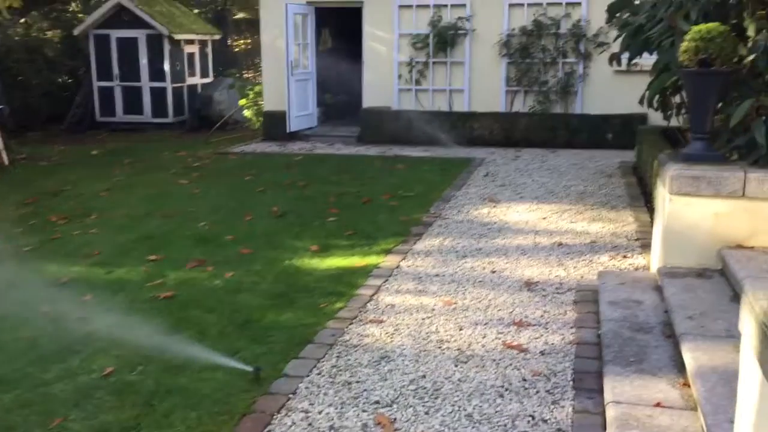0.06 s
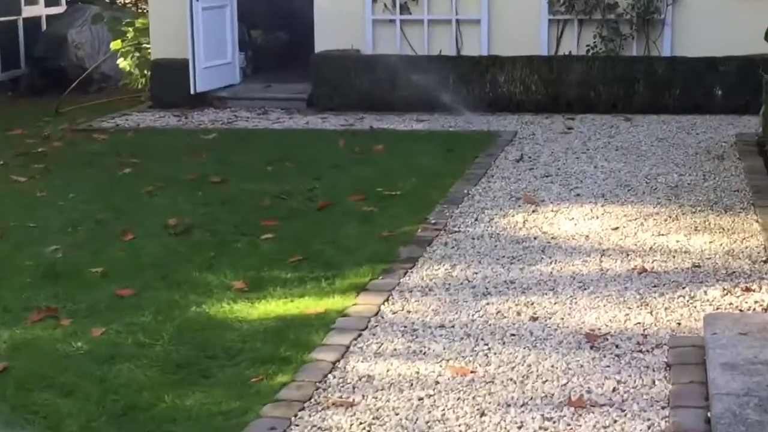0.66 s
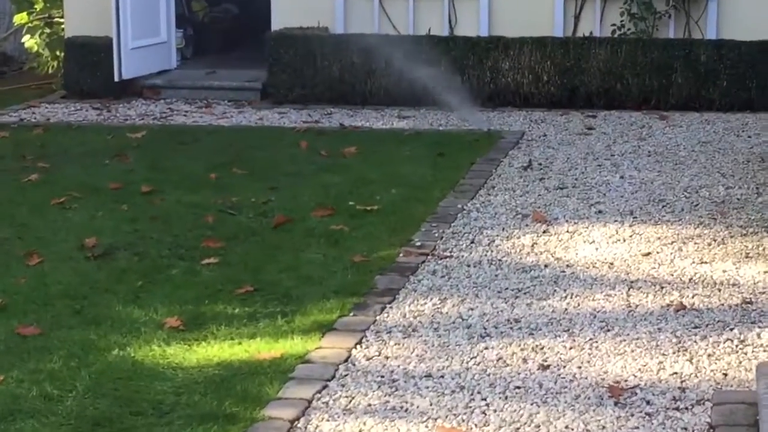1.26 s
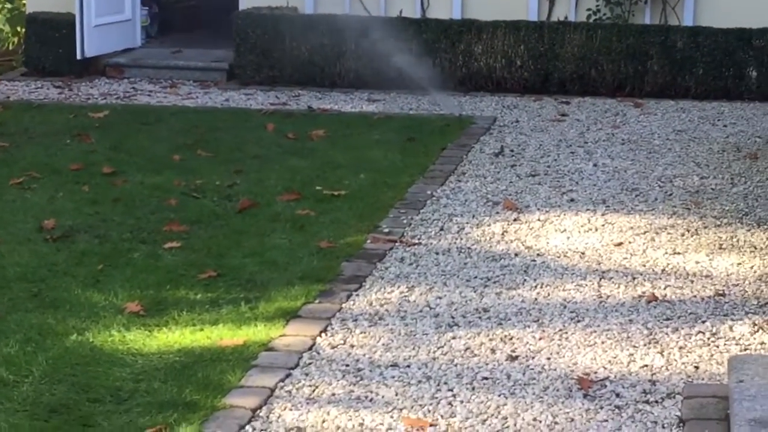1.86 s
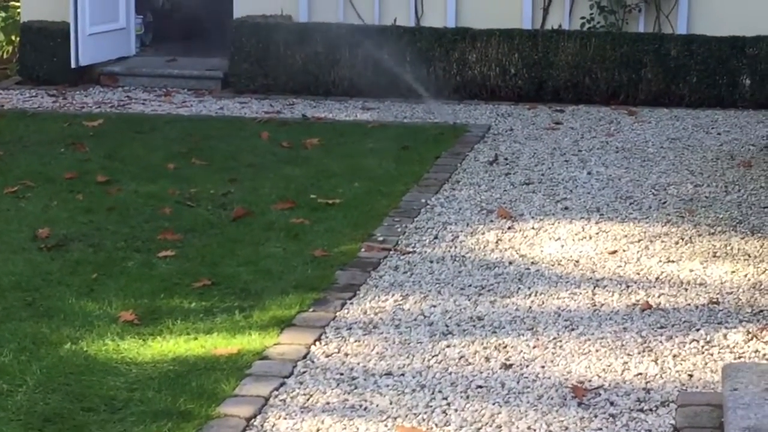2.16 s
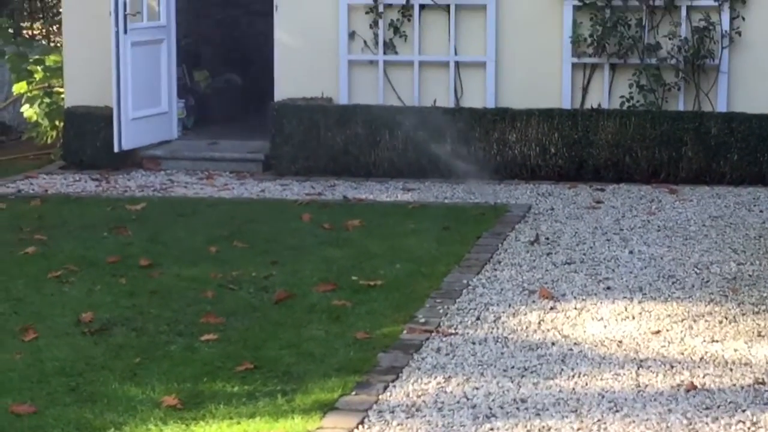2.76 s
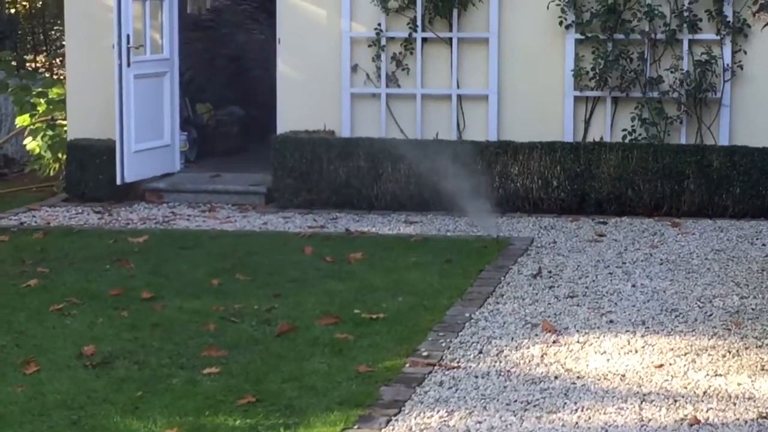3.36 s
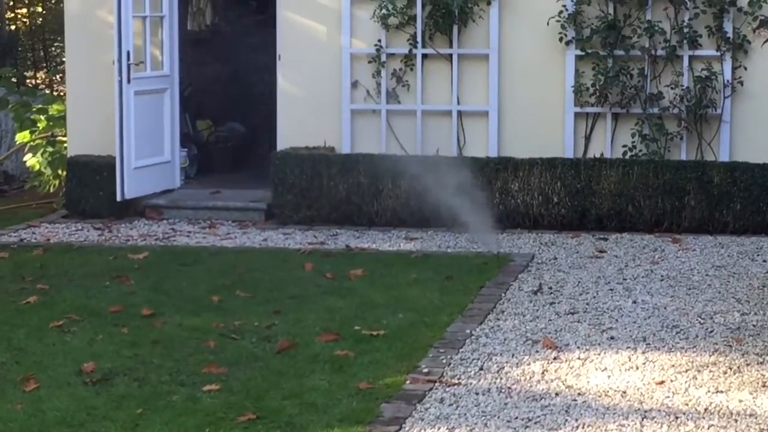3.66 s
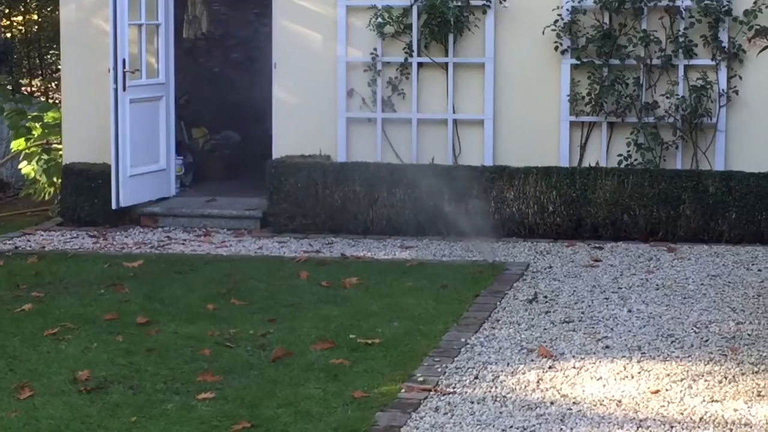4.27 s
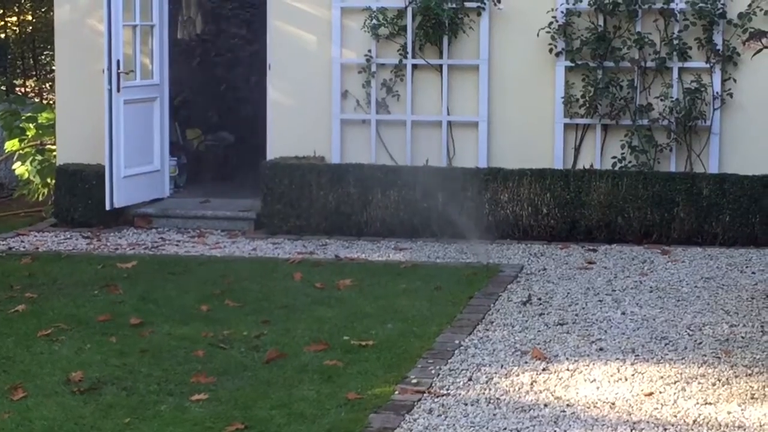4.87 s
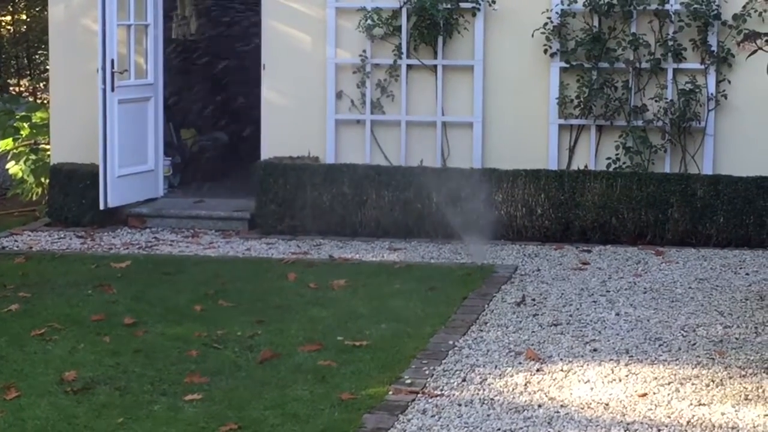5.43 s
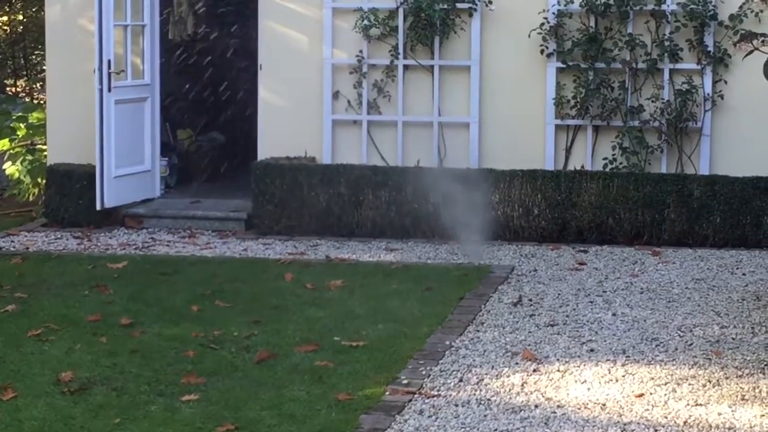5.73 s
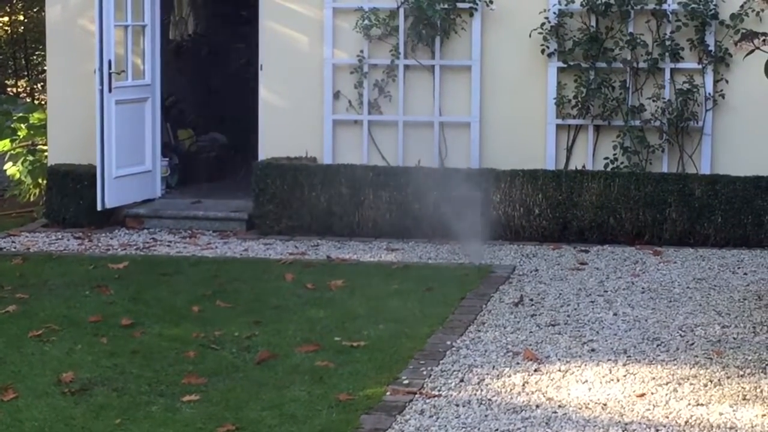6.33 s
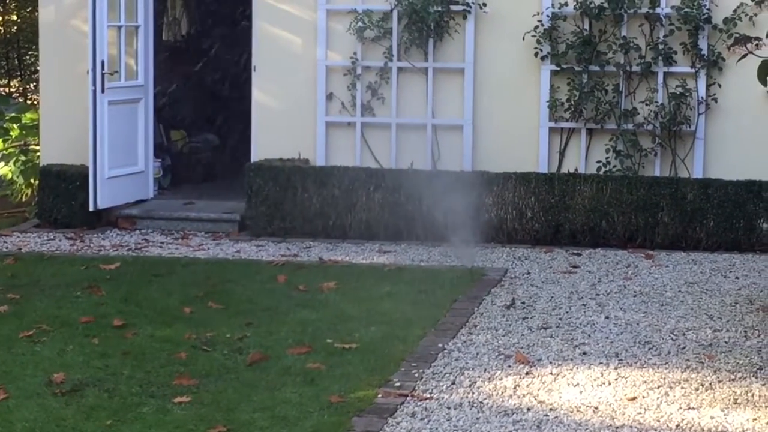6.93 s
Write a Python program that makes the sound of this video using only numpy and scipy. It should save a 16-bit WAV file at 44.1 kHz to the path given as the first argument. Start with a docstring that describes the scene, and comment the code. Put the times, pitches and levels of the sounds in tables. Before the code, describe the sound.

Lawn sprinklers spray with a steady, airy hiss while dense drops patter on leaves and soil and a few tick on stones nearby. At first the closest spray faces the microphone, sizzling with bright swishes. It then settles into a softer, even hiss before swishing again near the end. A low motor hum and a distant rumble lie underneath, outdoors in a garden.

```python
"""Pop-up sprinklers water a lawn, a hedge and a gravel path in front of a house.
From the start nozzles hiss, dense drops patter on leaves and soil and a few tick close by, over a
motor hum, probably the water pump, and a distant rumble. For the first two seconds the nearest fan
faces the microphone, sizzling among bright swishes. The spray then settles, the pipes ringing faintly
behind it. After five seconds the turning fans swish again, and near the end a far drone swells."""
import sys
import numpy as np
from scipy import signal
from scipy.fft import rfft, irfft, next_fast_len
from scipy.io import wavfile

SR = 44100
rng = np.random.default_rng(int(sys.argv[2]) if len(sys.argv) > 2 else 0)


def digitize_waveform(pressure):
    """Quantize a signal to 16-bit integers and store it at the path in sys.argv[1].

    Rows of a 2-D input are taken as channels; values are limited to [-1, 1].
    """
    field = np.atleast_2d(pressure).T
    bounded = np.clip(field, -1, 1)
    quanta = np.round(bounded * 32767).astype(np.int16)
    wavfile.write(sys.argv[1], SR, quanta)


N = 313110
TIME = np.arange(N) / SR


def from_db(db):
    """Decibels to gain."""
    return 10 ** (np.asarray(db) / 20)


def rms_one(x):
    """Scale to rms 1."""
    return x / np.sqrt(np.mean(x ** 2) + 1e-20)


def automation(points):
    """A curve of (time, value) points, read at every sample."""
    times, values = np.transpose(points)
    return np.interp(TIME, times, values)


def swell(start, end, rise_s, fall_s):
    """Fade in, hold at 1, fade out; half way up at start and end."""
    return np.clip(np.minimum((TIME - start) / rise_s, (end - TIME) / fall_s) + .5, 0, 1)


def coloured(x, spectrum):
    """Shape a flat signal with an EQ curve; rms 1."""
    size = next_fast_len(N)
    hz, db = np.transpose(spectrum)
    bin_hz = np.maximum(np.arange(size // 2 + 1) * SR / size, 1)
    gain = from_db(np.interp(np.log(bin_hz), np.log(hz), db))
    return rms_one(irfft(rfft(x, size) * gain, size)[:N])


def drift(rate):
    """Smooth random modulation with about this many turns a second; spread 1."""
    hop, run_in = 20, 4000
    pole = np.exp(-2 * np.pi * hop * rate / SR)
    noise = rng.standard_normal(N // hop + run_in + 2)
    slow = signal.lfilter([1], [1, -2 * pole, pole * pole], noise)[run_in:]
    return np.interp(np.arange(N) / hop, np.arange(len(slow)), rms_one(slow))


def resonance(x, hz, width_hz):
    """Ring a signal in a resonance whose centre may glide; rms 1."""
    carrier = np.exp(2j * np.pi * np.cumsum(hz * np.ones(N)) / SR)
    lowpass = signal.butter(2, width_hz / 2, fs=SR, output="sos")
    return rms_one((signal.sosfilt(lowpass, x / carrier + 1e-18) * carrier).real)


def drops(per_s, spread_db):
    """Impacts at random moments: many small ones and a few large; rms 1."""
    sizes = from_db(spread_db * np.minimum(rng.exponential(1, N), 4))
    return rms_one(sizes * rng.choice([-1, 1], N) * (rng.random(N) < per_s / SR))


# Wide, airy EQ of the mist: (frequency [Hz], relative level [dB])
MIST_EQ = [(400, -34), (1200, -13), (2400, -1.5), (3600, -2), (4500, 1), (6000, -1), (7500, -1.5),
           (8900, 1.5), (10000, 0), (11000, 2), (12400, 2), (14000, 1.5), (15700, -2.75)]
# Sharp presence peak of the nearest fan: (frequency [Hz], relative level [dB])
SIZZLE_EQ = [(3000, -15.5), (5200, -12.5), (5600, -0.5), (5950, -0.5), (6400, -3), (7000, -1), (7600, -7.5),
             (10000, -13)]


def nozzles(surge_db):
    """Jets break up into smooth hiss and grainy sizzle; the sizzle lifts while the fan faces us."""
    flutter = drift(21)
    facing = swell(start=0.18, end=2.06, rise_s=.06, fall_s=.3)  # turns in fast, away slowly
    hiss_db = -26.5 + 0.09 * surge_db - 0.9 * facing + 0.58 * flutter
    sizzle_db = -35 + 0.42 * surge_db + 4 * facing + 0.57 * flutter
    hiss = coloured(rng.standard_normal(N), MIST_EQ)
    sizzle = coloured(drops(per_s=9000, spread_db=4.0), SIZZLE_EQ)
    return from_db(hiss_db) * hiss + from_db(sizzle_db) * sizzle


# Bright passes of the spray: (start [s], end [s], centre [Hz], level [dB])
FAN_PASSES = [(-.1, 0.1, 13000, -30), (-.1, 0.092, 8300, -34), (.2, 1.87, 8600, -39),
              (.2, 2.12, 11020, -37), (.2, 1.74, 14700, -38), (1.72, 2.2, 7000, -37.5),
              (1.95, 2.34, 8300, -38.5), (2.25, 3.4, 13900, -54), (5.1, 6.9, 9200, -38.5),
              (5.4, 6.9, 12300, -48)]


def swishes():
    """The fans swish as they turn: narrow bands of hiss swell, hold and fade."""
    out = np.zeros(N)
    for start, end, hz, db in FAN_PASSES:
        band = resonance(rng.standard_normal(N), hz, width_hz=0.098 * hz)
        out += from_db(db) * swell(start, end, rise_s=.1, fall_s=.1) * band
    return out


# Gliding ring of the wet leaves: (time [s], pitch [Hz])
LEAF_RING = [(0.15, 1640), (1.39, 1810), (1.79, 1460), (2.53, 1900), (6.54, 1860), (7.1, 1980)]
# Midrange splash on foliage: (frequency [Hz], relative level [dB])
LEAF_EQ = [(50, -41), (400, -25.5), (800, -9.5), (1250, 1), (1700, -1.5), (2150, 0.5), (2600, -9.5),
           (4500, -10), (9000, -21), (16000, -35)]
# Dull body of the splats on soil: (frequency [Hz], relative level [dB])
SOIL_EQ = [(35, -23), (120, -4), (300, -2), (500, -3.5), (750, -0.5), (1000, -4), (1600, -0.5), (4000, -47)]


def patter(drumming_db, surge_db):
    """Drops land in clumps; leaves splash and ring briefly, soil answers with a dull splat."""
    leaf_hz = automation(LEAF_RING)
    leaf_db = drumming_db + 0.41 * surge_db  # leaves swing more than the patter as a whole
    # Big drops ring the leaves lower and hit the soil harder.
    octaves_down = np.log2(np.mean(leaf_hz) / leaf_hz)
    soil_db = -48.5 + 1.1 * surge_db + 10.0 * octaves_down
    clumps = from_db(1.6 * drift(25))
    splash = coloured(drops(per_s=7000 * clumps, spread_db=2.5), LEAF_EQ)
    ring = resonance(drops(per_s=4000 * clumps, spread_db=2.5), leaf_hz, width_hz=530)
    soil = coloured(drops(per_s=3500 * clumps, spread_db=3.5), SOIL_EQ)
    return from_db(leaf_db - 2.0) * splash + from_db(leaf_db - 5.5) * ring + from_db(soil_db) * soil


def near_drops(level_db):
    """Stray drops tick on stones close by."""
    ticks = drops(per_s=45, spread_db=4.0)
    crisp_band = signal.butter(1, [1200, 11000], "band", fs=SR, output="sos")
    return from_db(level_db) * rms_one(signal.sosfilt(crisp_band, ticks + 1e-18))


# Breathy tones of pipes and sprinkler heads: (pitch [Hz], width [Hz], base level [dB])
PIPE_TONES = [(949.4, 22, -56.5), (1243, 33, -59), (1598, 48, -54), (1940, 120, -51.5), (2984, 31, -54),
              (3347, 94, -53), (4320, 130, -55), (4570, 120, -53.5), (5140, 200, -49.5), (5650, 130, -60)]


def pipe_whistles(surge_db):
    """The flow sets the plumbing ringing faintly; each resonance comes and goes."""
    out = np.zeros(N)
    for hz, width_hz, db in PIPE_TONES:
        gain = from_db(db + 0.09 * surge_db + 3.0 * drift(1.0))
        out += gain * resonance(rng.standard_normal(N), hz, width_hz)
    return out


# Low hum of the motor: (pitch [Hz], level [dB], waver depth [0-1])
MOTOR_TONES = [(45.5, -50, 0.05), (76, -55.5, 0.7), (91.7, -44.8, 0.2), (136.6, -54.5, 0.24),
               (198.7, -68.5, 0.05), (245, -61, 0.2)]


def pump():
    """A motor hums on steady tones, each wavering in strength and phase."""
    out = np.zeros(N)
    for hz, db, depth in MOTOR_TONES:
        waver = 1 + depth * (drift(3.2) + 1j * drift(3.4))
        out += from_db(db) * rms_one((waver * np.exp(2j * np.pi * hz * TIME)).real)
    return out


# Dark bed of the neighbourhood: (frequency [Hz], relative level [dB])
RUMBLE_EQ = [(20, -40), (38, -25), (50, -9), (58, 4), (70, -3), (86, 3), (104, -4.5), (118, 0), (135, 4.5),
             (150, -1.5), (200, -8), (330, -12), (520, -26), (1500, -39)]
# Fader ride of the far drone: (time [s], level [dB])
DRONE_RIDE = [(0.0, -61.5), (3.5, -57.5), (5.3, -55), (6.4, -48), (6.8, -59), (7.1, -52)]


def neighbourhood(rumble_db):
    """A distant low rumble, and a wavering drone that slowly comes up."""
    drone_hz = 280 + 4.12 * drift(4.9)
    tremble = from_db(3.5 * drift(7.6))
    drone = rms_one(np.sin(2 * np.pi * np.cumsum(drone_hz) / SR) * tremble)
    rumble = coloured(rng.standard_normal(N), RUMBLE_EQ)
    return from_db(rumble_db) * rumble + from_db(automation(DRONE_RIDE)) * drone


def garden_echoes(x, echo_db, sway_s, count=7):
    """Ground, steps and wall send back short echoes that shift as the hand-held microphone sways."""
    out, samples = x.copy(), np.arange(N)
    for delay_s in rng.uniform(.0015, .009, count):
        lag = np.round((delay_s + sway_s * drift(.15)) * SR).astype(int)
        out += from_db(echo_db) * x[(samples - lag) % N]
    return out / np.sqrt(1 + count * from_db(echo_db) ** 2)


# How hard the sweeping fans drum on the foliage: (time [s], level [dB])
FAN_DRUMMING = [(0.0, -33.5), (0.39, -31), (0.45, -33.5), (0.58, -31), (0.89, -34), (1.48, -34),
                (1.55, -35.5), (3.12, -35.5), (3.63, -34), (4.07, -37.0), (4.16, -35.1), (5.13, -39),
                (5.49, -33.5), (5.84, -34.1), (5.9, -36.5), (6.2, -35), (6.74, -35.5), (7.09, -36.8)]


def scene():
    """The mix, alike in both channels; the fans' sweep rides the patter, nozzles and whistles."""
    drumming_db = automation(FAN_DRUMMING)
    surge_db = drumming_db - np.mean(drumming_db)
    water = nozzles(surge_db) + swishes() + patter(drumming_db, surge_db) + near_drops(level_db=-50.5)
    water = garden_echoes(water, echo_db=-27, sway_s=.00003)
    mix = water + pipe_whistles(surge_db) + pump() + neighbourhood(rumble_db=-46.0)
    return np.array([mix, mix])


# Treble notches of the microphone port: (centre [Hz], width [Hz], gain [dB])
PORT_NOTCHES = [(4950, 360, -2), (7600, 510, -1), (10400, 650, -5.5)]


def record(dry):
    """The microphone port carves a few dips; a steep high cut takes off the top."""
    for hz, width_hz, db in PORT_NOTCHES:
        b, a = signal.iirpeak(hz, hz / width_hz, fs=SR)
        dry = dry + (from_db(db) - 1) * signal.lfilter(b, a, dry)
    high_cut = signal.ellip(12, .1, 90, 15850, fs=SR, output="sos")
    return signal.sosfilt(high_cut, dry)


dry = scene()
out = record(dry)
digitize_waveform(out)
```